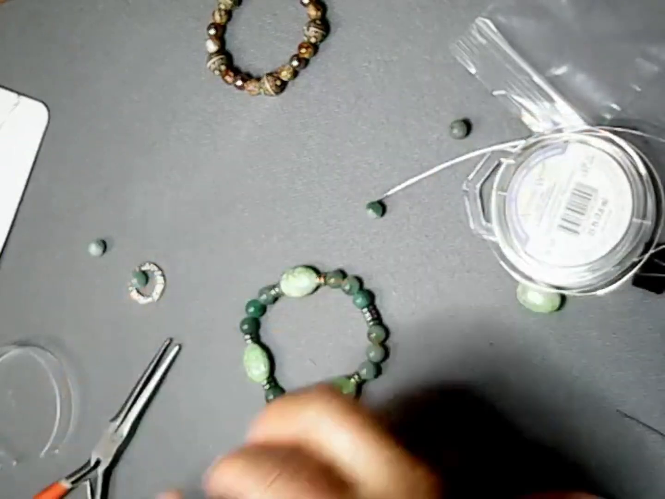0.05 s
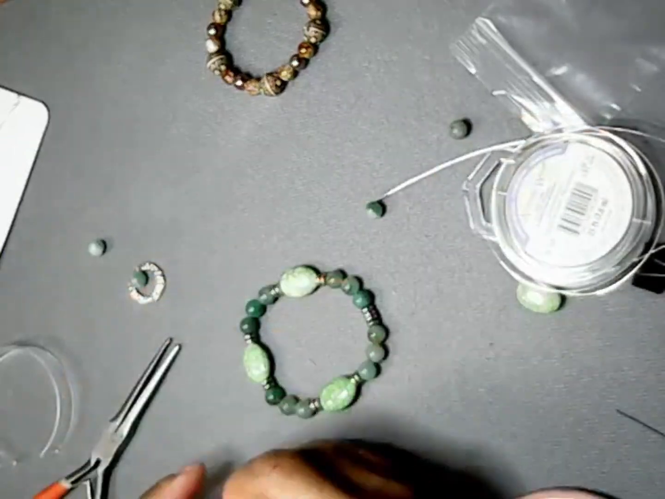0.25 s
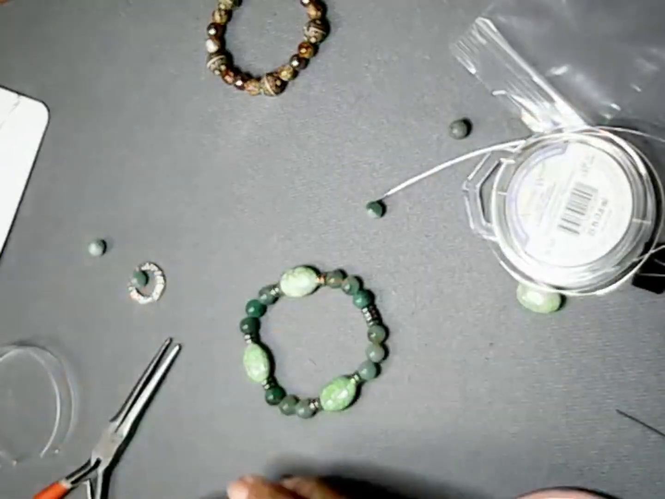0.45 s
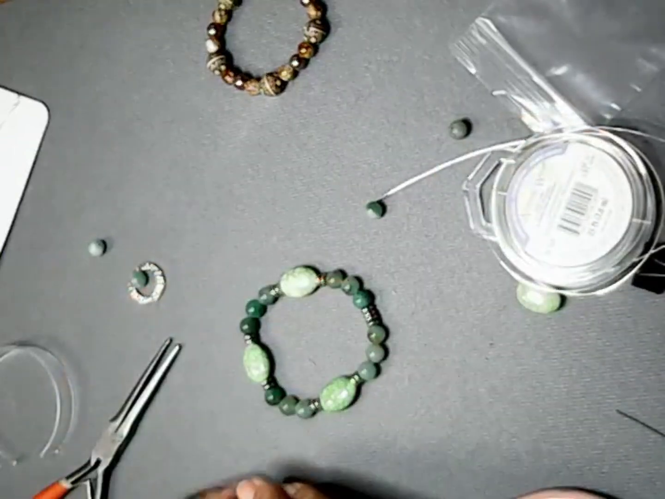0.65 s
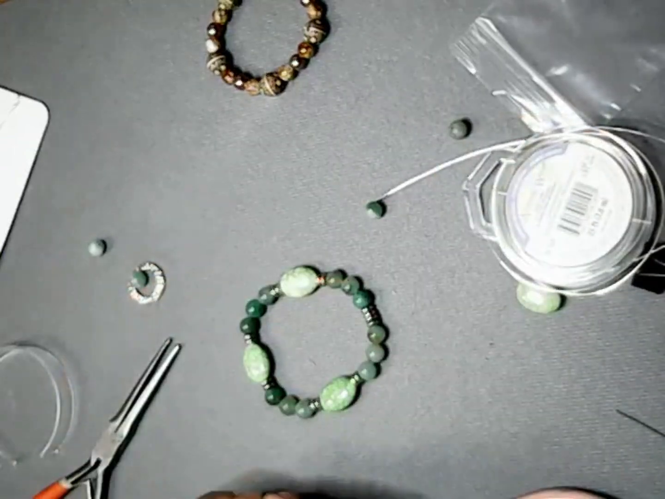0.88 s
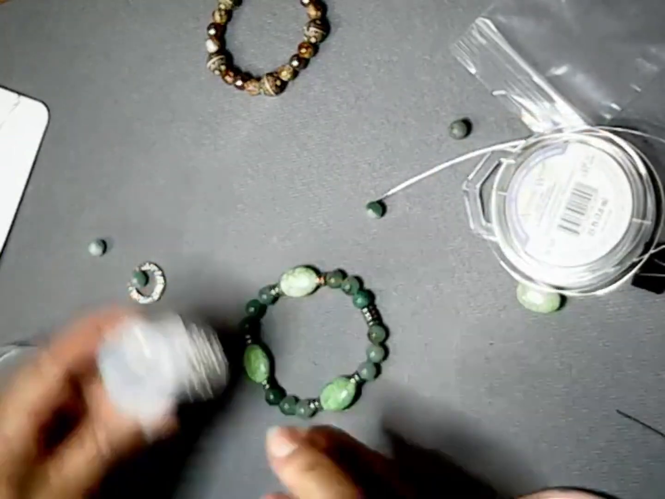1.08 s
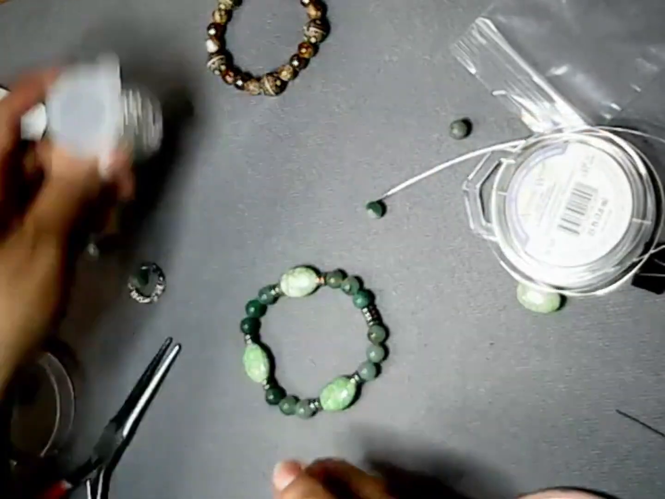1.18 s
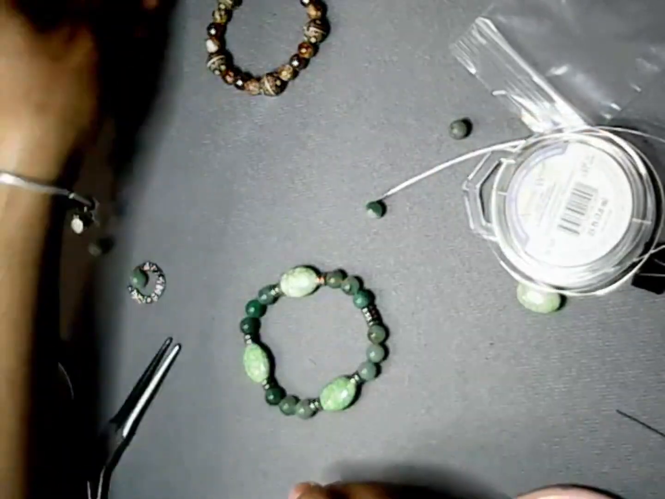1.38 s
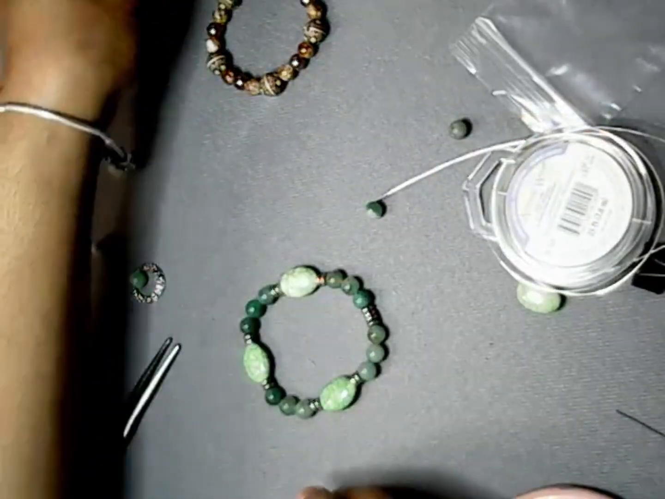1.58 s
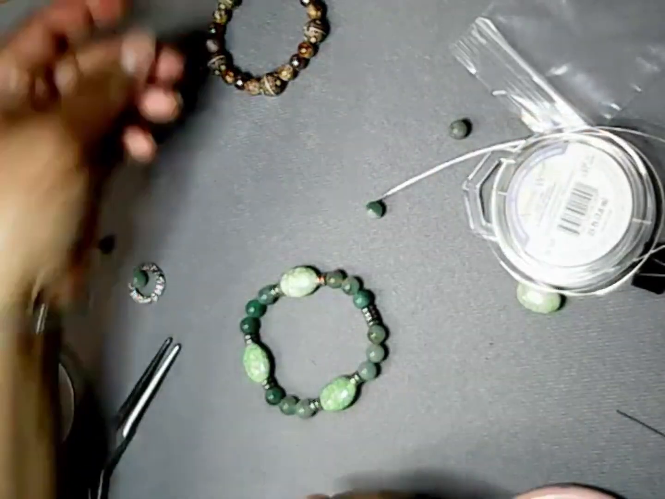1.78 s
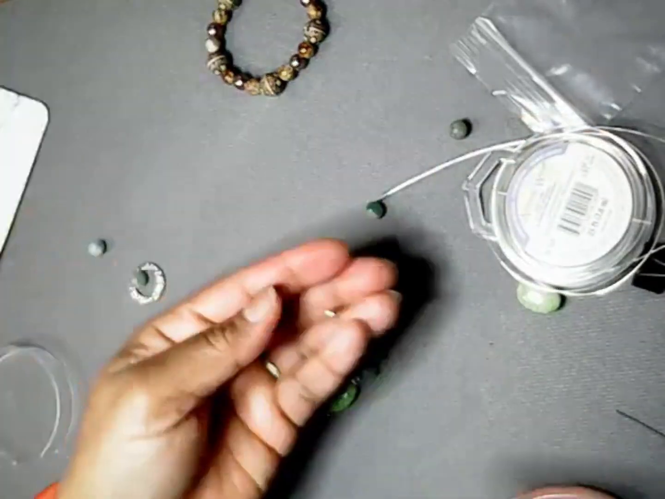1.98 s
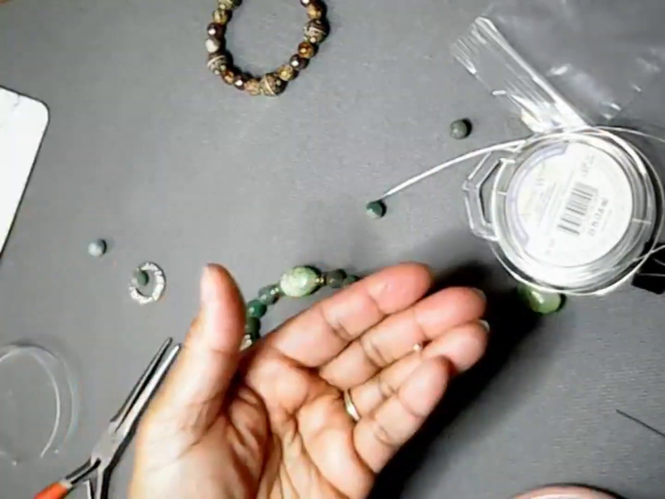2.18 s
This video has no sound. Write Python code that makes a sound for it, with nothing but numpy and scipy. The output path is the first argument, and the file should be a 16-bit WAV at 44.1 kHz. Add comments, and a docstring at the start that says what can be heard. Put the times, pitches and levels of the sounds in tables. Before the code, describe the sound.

A small plastic tub of glass beads, heard close in a quiet humming room. From 0.1 to 0.6 s fingers knock and rub the hollow plastic, with a brief falling squeak at 0.4. At 0.64 s the lid snaps shut, hard and loud. Faint bead slides and dry ticks follow. From 1.63, strongest 1.75-2.0 s, the tub clatters onto the table, beads rattling. Dull, narrow, clipped peaks.

```python
"""A work table, heard close up: small glass beads in a plastic tub, over mains hum and room noise.
Fingers knock and rub the tub, ringing its damped modes; the lid squeaks, then snaps shut with a crack.
The beads slide as grainy sizzles, then roll and rattle as repeated blows ring both tub and table.
Now and then the hum skips ahead with a dry tick. The microphone is narrow and clips its loudest peaks."""
import sys
import numpy as np
from scipy import signal
from scipy.fft import rfft, irfft
from scipy.io import wavfile

SR = 44100
rng = np.random.default_rng(int(sys.argv[2]) if len(sys.argv) > 2 else 0)


def unload_wav(signal):
    """Save mono or channel-first audio to the path in sys.argv[1] as 16-bit WAV at rate SR, clipped to [-1, 1]."""
    wavfile.write(
        sys.argv[1],
        SR,
        np.round(np.clip(np.atleast_2d(signal).T, -1, 1) * 32767).astype(np.int16),
    )


N = 99225  # samples, 2.25 s


def undb(db):
    """Decibels to gain."""
    return 10 ** (np.asarray(db) / 20)


def since(start):
    """Seconds since a moment, zero before it."""
    return np.maximum(np.arange(N) / SR - start, 0)


def curve(points):
    """Gain along a list of times in seconds and levels in dB."""
    times, levels_db = np.array(points).T
    return undb(np.interp(since(0), times, levels_db))


def fade(t, t60):
    """Exponential decay that starts when t leaves zero and loses 60 dB in t60 seconds."""
    out = np.zeros(len(t))
    live = (t > 0) & (t < 2 * t60)
    out[live] = np.exp(-np.log(1000) * t[live] / t60)
    return out


def tint(x, colour):
    """Give a signal a spectrum drawn through points in Hz and dB, and an rms of 1."""
    hz, db = np.array(colour).T
    f = np.maximum(np.fft.rfftfreq(N, 1 / SR), 1)
    gain = undb(np.interp(np.log(f), np.log(hz), db))
    bass_rolloff = np.minimum(f / hz[0], 1) ** 2  # below the first point
    y = irfft(rfft(x) * gain * bass_rolloff, N)
    return y / np.std(y)


def noise(colour):
    """Steady hiss or rumble: random noise with a chosen spectrum."""
    return tint(rng.standard_normal(N), colour)


def grains(rate, spread_db, colour):
    """Tiny contacts at random moments, rate per second, of uneven size and either sign."""
    size = undb(spread_db * np.minimum(rng.exponential(size=N), 4))
    struck = rng.random(N) < rate / SR
    return tint(struck * size * rng.choice([-1, 1], N), colour)


def ring(start, modes, attack_s, stretch=1, bend=0):
    """Damped modes after one blow; bent plastic starts sharp and relaxes to its own pitch."""
    out = np.zeros(N)
    first = int(np.ceil(start * SR))
    t = np.arange(first, min(first + SR // 5, N)) / SR - start  # at most 0.2 s
    clock = t + bend * BEND_S * (1 - np.exp(-t / BEND_S))  # runs fast at first
    swing = sum(undb(db) * fade(t, t60 * stretch) * np.sin(2 * np.pi * hz * clock)
                for hz, db, t60 in modes)
    onset = 1 - np.exp(-(t / attack_s) ** 2)
    out[first:first + len(t)] = onset * swing
    return out


# Swell of the mains hum. Each row: time in seconds, level in dB.
HUM_LEVEL = [(0, -45.5), (.18, -44), (.33, -37.5), (.7, -37.5), (.82, -40.5), (1.0, -45)]
# Spectrum of the room noise. Each row: frequency in Hz, relative level in dB.
ROOM = [(120, -34.5), (200, -3), (460, -8), (810, -8.5), (1040, 1), (1320, -11.5), (2190, -22.5),
        (4480, -24.5), (7000, -30), (9100, -92)]
# Spectrum of the low rumble. Each row: frequency in Hz, relative level in dB.
RUMBLE = [(20, -27), (50, -17.5), (95, 0), (220, -8), (320, -17), (1000, -69)]
# Moments when the hum skips. Each row: time in seconds, level of the tick in dB.
SKIPS = [(0.1808, -48), (0.2804, -30), (0.8281, -42), (1.0283, -53), (1.1299, -42), (1.3295, -44),
         (1.4293, -46), (1.6288, -57.5), (1.7303, -41), (1.8293, -35), (1.9296, -18), (2.13, -53),
         (2.2289, -37.5)]
HUM_HZ, OVERTONE_DB = 119.4, -24.5  # overtone relative to the hum
ROOM_DB, RUMBLE_DB = -54.5, -55
SKIP_S, TICK_T60_S = 0.003237, 0.0017  # hum time lost per skip, decay of its tick


def background():
    """Mains hum and its overtone under room noise; at each skip the hum jumps with a dry tick."""
    t = since(0)
    clock = t + SKIP_S * sum(t > start for start, _ in SKIPS)
    phase = 2 * np.pi * (HUM_HZ * clock + rng.random())
    tone = np.sin(phase) + undb(OVERTONE_DB) * np.sin(2 * phase)
    hum = np.sqrt(2) * curve(HUM_LEVEL) * tone
    ticks = sum(undb(db) * fade(since(start), TICK_T60_S) for start, db in SKIPS)
    air = undb(ROOM_DB) * noise(ROOM) + undb(RUMBLE_DB) * noise(RUMBLE)
    return hum + ticks + air


# The lid's short high modes, rung by a sharp tick. Each row: frequency in Hz, level in dB, decay t60 in
# seconds.
TICK_MODES = [(3290, 2.5, .008), (4430, -11.5, 0.016), (5690, -6, 0.0084)]


def tick(start):
    """One sharp tick on the lid: a tiny bright ring of short modes."""
    return ring(start, TICK_MODES, SNAP_ATTACK_S)


# Lone ticks of the lid in its own high modes. Each row: start in seconds, level in dB.
TICKS = [(0.6617, -35.5), (0.6817, -36.5), (.9797, -46.5), (1.316, -48)]
# Beads sliding on each other.
# Each row: start in seconds, length in seconds, lower resonance in dB, upper resonance in dB.
SLIDES = [(0.018, 0.027, -52.5, -56.5), (0.923, 0.03, -64, -80), (1.2287, 0.017, -49.5, -49),
          (1.749, 0.014, -53, -50), (1.768, 0.018, -55, -42.5), (1.806, 0.013, -54, -51),
          (1.844, 0.019, -47.5, -53.5), (1.878, 0.0093, -55.5, -55), (1.901, 0.015, -44, -50.5),
          (1.936, 0.03, -59.5, -66.5)]
# Lower resonance of glass on glass. Each row: frequency in Hz, relative level in dB.
GLASS_LOW = [(3700, -23.5), (4450, 5), (4950, -7), (7000, -27)]
# Upper resonance of glass on glass. Each row: frequency in Hz, relative level in dB.
GLASS_HIGH = [(4000, -26.5), (5100, -3), (5650, 7), (6150, -12), (7000, -18.5)]
SLIDE_ATTACK_S, SLIDE_T60_S = 0.001, 0.057
BEAD_HITS_PER_S, BEAD_SPREAD_DB = 1500, 2.5


def beads():
    """Glass on glass: a grainy sizzle in two resonances, balanced anew each slide; and the lid's lone ticks."""
    low = grains(BEAD_HITS_PER_S, BEAD_SPREAD_DB, GLASS_LOW)
    high = grains(BEAD_HITS_PER_S, BEAD_SPREAD_DB, GLASS_HIGH)
    out = sum(undb(db) * tick(start) for start, db in TICKS)
    for start, length, low_db, high_db in SLIDES:
        onset = 1 - np.exp(-since(start) / SLIDE_ATTACK_S)
        release = np.exp(-np.log(1000) * since(start + length) / SLIDE_T60_S)
        out = out + onset * release * (undb(low_db) * low + undb(high_db) * high)
    return out


# Knocks of fingers, lid and beads on the held tub.
# Each row: start in seconds, level in dB, pitch of the first mode in Hz, level of the crackle in dB.
HANDLING = [(0.1174, -30, 1011, -39), (0.13, -33, 1043, -64), (0.193, -24, 977, -31.5),
            (.209, -22, 1065, -35.5), (0.2221, -22, 1023, -34.5), (0.229, -27, 1076, -32),
            (.239, -24.5, 993, -52), (0.263, -29.5, 1005, -69), (.284, -26.5, 1003, -33.5),
            (0.297, -32, 965, -35), (.338, -12.5, 1098, -34.5), (0.351, -27.5, 1190, -50),
            (0.364, -26, 1122, -36.5), (0.383, -30, 1165, -46), (0.3985, -17.5, 1063, -45.5),
            (0.4593, -22, 1085, -42), (0.5598, -31.5, 1060, -40), (0.655, -21.5, 910, -48),
            (0.667, -27, 978, -63), (0.683, -28.5, 965, -68), (1.0595, -35.5, 1058, -38.5)]
# Modes of the held tub; each knock supplies its own pitch for the first.
# Each row: frequency in Hz, level in dB, decay t60 in seconds.
HELD_MODES = [(1050, 7.5, 0.031), (1249, 0, 0.021), (887, -20, 0.035), (452, -36, 0.022),
              (4440, -25.5, 0.029)]
# Spectrum of the plastic's crackle, shared with the lid. Each row: frequency in Hz, relative level in dB.
CRACK = [(300, -19), (1500, 8.5), (2500, -2.5), (3700, -13), (4450, 0.5), (5000, -19), (5700, -13.5),
         (7000, -43.5)]
# Fingers and beads rubbing on the tub. Each row: time in seconds, level in dB.
RUB_LEVEL = [(.11, -54), (.125, -36), (.175, -43), (.22, -29.5), (.26, -32), (.4, -36), (.53, -43),
             (.57, -32.5), (.62, -42.5), (.68, -34), (.73, -44), (.82, -52), (1.058, -54), (1.075, -40.5),
             (1.16, -67), (1.41, -48), (1.58, -73.5), (1.76, -40.5), (2.01, -38), (2.045, -63)]
# Spectrum of the rub. Each row: frequency in Hz, relative level in dB.
RUB = [(100, -11), (320, -9), (850, -12), (1030, 4), (1170, -6), (1450, -18), (3500, -39), (4450, -30),
       (5000, -40), (7000, -43)]
HELD_ATTACK_S, CRACK_T60_S = 0.0012, 0.039
CRACK_GRAINS_PER_S, RUB_GRAINS_PER_S, RUB_SPREAD_DB = 1400, 1500, -1
KNOCK_TICK_DB = -5  # relative to the crackle


def handling():
    """Short knocks on damped plastic, each with a crisp tick and a crackle, over a grainy rub."""
    crack = grains(CRACK_GRAINS_PER_S, RUB_SPREAD_DB, CRACK)
    out = curve(RUB_LEVEL) * grains(RUB_GRAINS_PER_S, RUB_SPREAD_DB, RUB)
    for start, db, hz, crack_db in HANDLING:
        modes = [(hz, *HELD_MODES[0][1:])] + HELD_MODES[1:]
        knock = undb(db) * ring(start, modes, HELD_ATTACK_S)
        contact = crack * fade(since(start), CRACK_T60_S) + undb(KNOCK_TICK_DB) * tick(start)
        out = out + knock + undb(crack_db) * contact
    return out


# The lid's short squeak. One row: start in seconds, starting pitch in Hz, glide in Hz per second,
# level in dB, decay t60 in seconds.
SQUEAK = (0.4, 1718, -9000, -31, 0.08)


def squeak():
    """The lid drags on the rim: a brief rough tone that falls."""
    start, hz, glide, db, t60 = SQUEAK
    t = since(start)
    wobble = noise([(30, 0), (200, 0), (500, -40), (2000, -90)])
    pitch = (hz + glide * np.minimum(t, .06)) * (1 + .1 * wobble)  # glides for 0.06 s
    phase = 2 * np.pi * np.cumsum(pitch) / SR
    onset = 1 - np.exp(-t / HELD_ATTACK_S)
    return undb(db) * fade(t, t60) * onset * np.sin(phase)


# The lid snapping shut: catch, seat and rebound. Each row: start in seconds, level in dB.
SNAP = [(0.6395, -4), (0.6422, 3), (0.6486, -15.5)]
# Modes of the whole tub at the snap. Each row: frequency in Hz, level in dB, decay t60 in seconds.
SNAP_MODES = [(1020, 1.5, 0.021), (1210, -13.5, 0.048), (910, -19, 0.059), (430, -11, 0.029),
              (201, -19, 0.073), (129, -14, 0.053), (2750, -26, 0.013), (3170, -13.5, 0.008)]
SNAP_ATTACK_S, SNAP_CRACK_DB, SNAP_CRACK_T60_S = 0.00083, -19, 0.016
SNAP_BEND, BEND_S = 0.11, 0.0031  # share by which the strained rim starts sharp, time it takes to relax


def lid():
    """The lid catches and seats: a hard crack and the tub's ring, falling as the rim relaxes."""
    crack = undb(SNAP_CRACK_DB) * noise(CRACK)
    out = np.zeros(N)
    for start, db in SNAP:
        body = ring(start, SNAP_MODES, SNAP_ATTACK_S, bend=SNAP_BEND)
        out = out + undb(db) * (body + crack * fade(since(start), SNAP_CRACK_T60_S))
    return out


# The tub's own ring. One row: frequency in Hz, level in dB, decay t60 in seconds before stretching.
TUB_RING = (1092, 0, 0.062)
# Modes of the table, swinging in turn against and with the tub.
# Each row: frequency in Hz, level in dB, decay t60 in seconds before stretching.
TABLE_MODES = [(267, -26, 0.14), (389, -24, .03), (540.5, -14, 0.066), (671, -7.5, 0.078), (752, -5, 0.039),
               (826, -4, 0.054), (1030, -18, 0.032), (1105, -9, 0.047), (1397, -15, 0.034),
               (1480, -25.5, 0.027), (1920, -26.5, 0.039)]
TABLE_ATTACK_S = 0.001


def blow(start, stretch, thud_db):
    """The tub meets the table once: its ring plus table modes of alternating sign."""
    against = ring(start, TABLE_MODES[0::2], TABLE_ATTACK_S, stretch)
    along = ring(start, TABLE_MODES[1::2], TABLE_ATTACK_S, stretch)
    tub = ring(start, [TUB_RING], TABLE_ATTACK_S, stretch)
    return tub + undb(thud_db) * (along - against)


def stirred(force, stretch, thud_db):
    """Many small contacts drive tub and table: their force convolved with one unit-energy blow."""
    body = blow(0, stretch, thud_db)
    return signal.fftconvolve(force, body / np.linalg.norm(body))[:N]


# The tub rocking on the table with the beads jumping in it.
# Each row: start in seconds, level in dB, ring length as a factor, table thud in dB against the tub.
SET_DOWN = [(1.632, -30.5, 1.3, -22), (1.671, -30, 1.43, -24), (1.752, -12, 1.02, -7),
            (1.772, -17.5, 1.3, -1.5), (1.7978, -8.5, 0.53, 1.5), (1.81, -17.5, 0.62, 4.5),
            (1.8444, -7, 0.62, -3.5), (1.8535, -13.5, 2.94, -8), (1.903, -8, 1.32, -9),
            (1.92, -24, 0.2, 15.5), (1.946, -13.5, 0.31, 2.5), (1.9853, -17, 0.74, -4.5),
            (2.007, -24.5, 0.87, -15)]
# Spectrum of the beads' splash under each blow. Each row: frequency in Hz, relative level in dB.
SPLASH = [(900, 0), (2200, -8), (4500, -34)]
# Beads rolling on the tub's floor as it comes down. Each row: time in seconds, level in dB.
ROLL_LEVEL = [(1.6, -60.5), (1.64, -43.5), (1.74, -48.5), (1.77, -34), (2.02, -33.5), (2.035, -83)]
SPLASH_DB, CHATTER_DB = -32, -25  # relative to the blow
CHATTER_T60_S, CHATTER_HITS_PER_S = 0.044, 460


def set_down():
    """Blows ring tub and table with a splash of beads, which chatter and roll into the same modes."""
    contacts = grains(CHATTER_HITS_PER_S, BEAD_SPREAD_DB, [(100, 0), (7000, 0)])
    jolt = sum(undb(db) * fade(since(start), CHATTER_T60_S) for start, db, _, _ in SET_DOWN)
    blows = sum(undb(db) * blow(start, stretch, thud_db) for start, db, stretch, thud_db in SET_DOWN)
    splash = undb(SPLASH_DB) * jolt * tint(contacts, SPLASH)
    chatter = stirred(undb(CHATTER_DB) * jolt * contacts, stretch=.33, thud_db=-.5)
    roll = stirred(curve(ROLL_LEVEL) * contacts, stretch=.5, thud_db=1.5)
    return blows + splash + chatter + roll


def scene():
    """Room, beads and tub in one channel."""
    return (background() + beads() + handling() + squeak() + lid() + set_down())[None]


HIGHPASS_HZ, MIC_TOP_HZ, TOP_HZ = 79, 7100, 8200
CLIP_LEVEL = .53  # of full scale


def lowpass(x, hz):
    """A steep elliptic cut-off of the treble."""
    return signal.sosfilt(signal.ellip(10, .2, 80, hz, fs=SR, output="sos"), x)


def record(dry):
    """A narrow-band microphone, hard clipping of the peaks, then the recorder's cut-off."""
    bass_cut = signal.butter(4, HIGHPASS_HZ, "high", fs=SR, output="sos")
    mic = signal.sosfilt(bass_cut, lowpass(dry, MIC_TOP_HZ))
    return lowpass(np.clip(mic, -CLIP_LEVEL, CLIP_LEVEL), TOP_HZ)


dry = scene()
out = record(dry)
unload_wav(out)
```